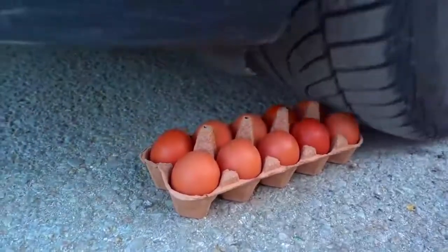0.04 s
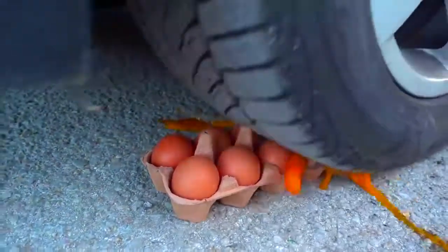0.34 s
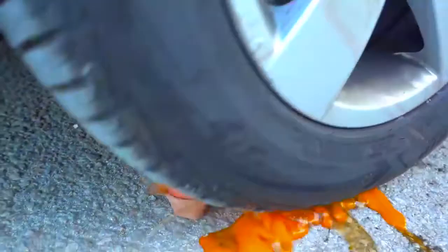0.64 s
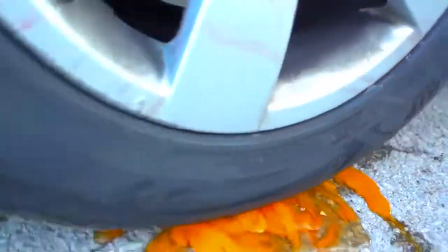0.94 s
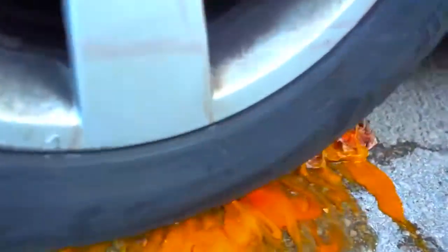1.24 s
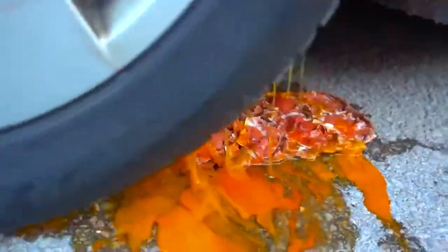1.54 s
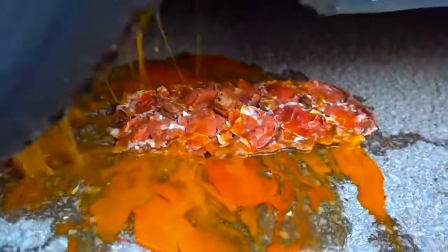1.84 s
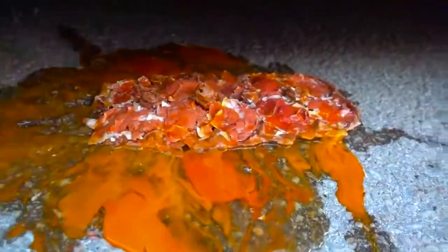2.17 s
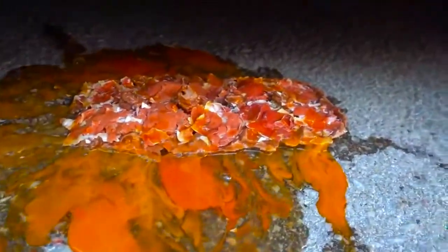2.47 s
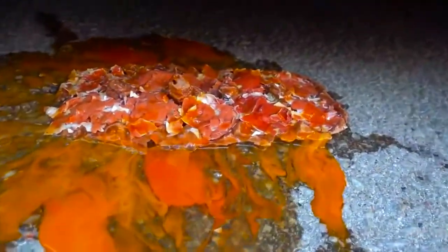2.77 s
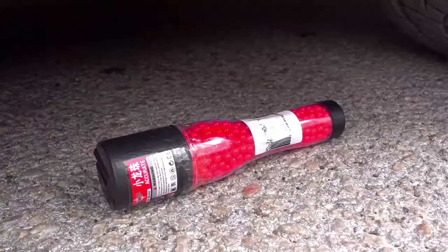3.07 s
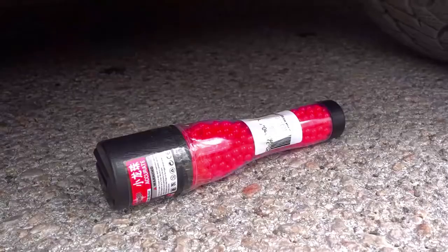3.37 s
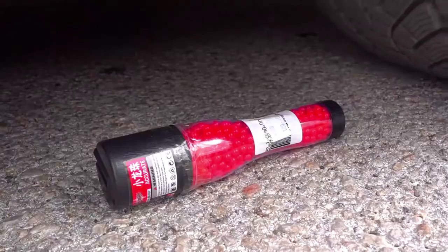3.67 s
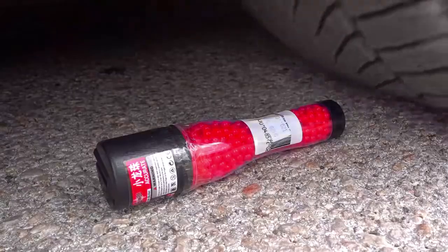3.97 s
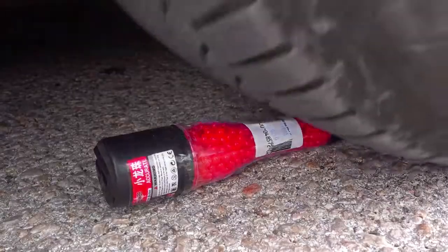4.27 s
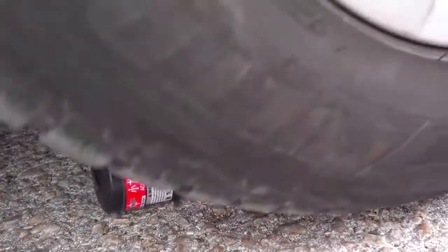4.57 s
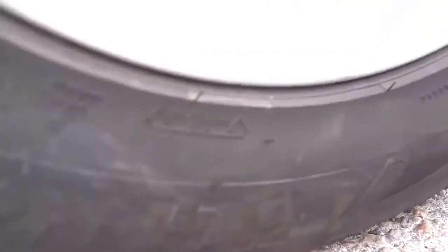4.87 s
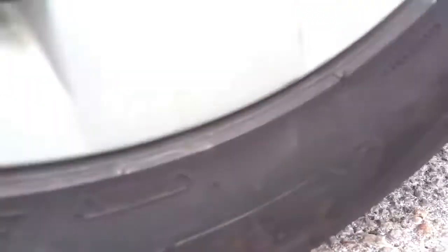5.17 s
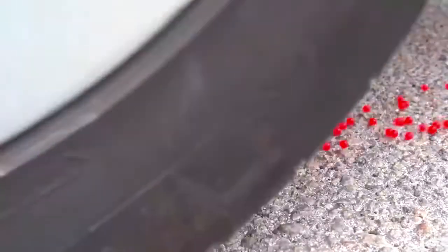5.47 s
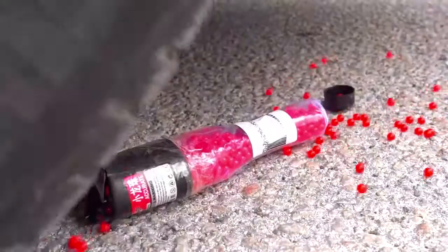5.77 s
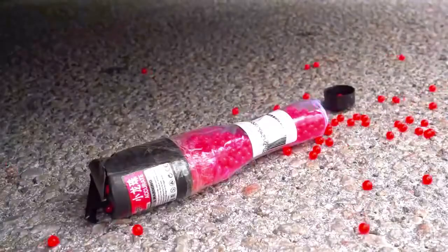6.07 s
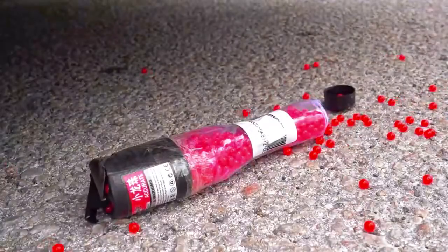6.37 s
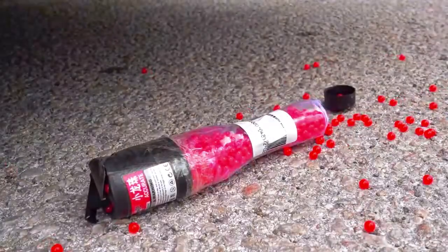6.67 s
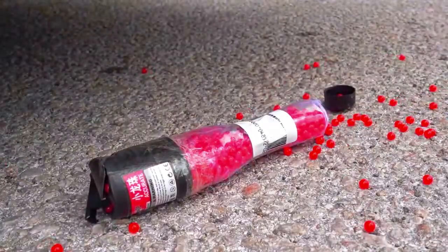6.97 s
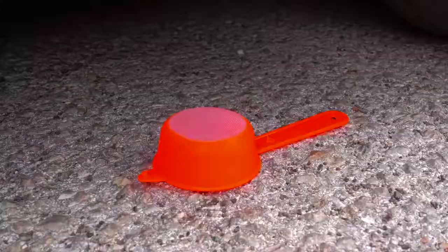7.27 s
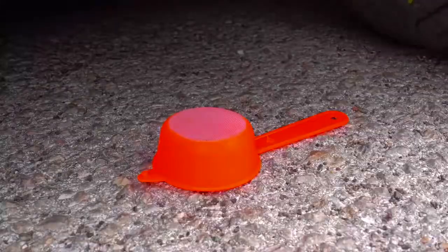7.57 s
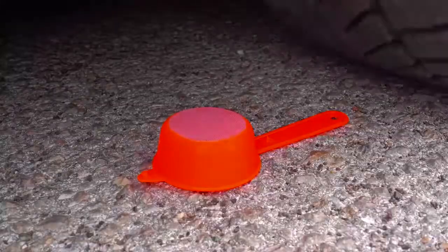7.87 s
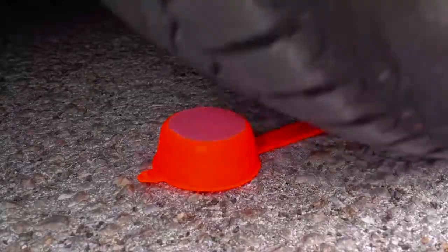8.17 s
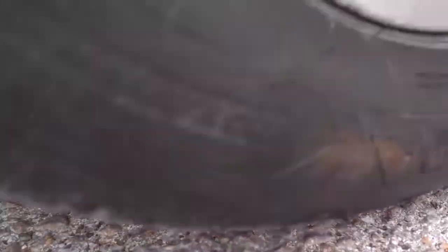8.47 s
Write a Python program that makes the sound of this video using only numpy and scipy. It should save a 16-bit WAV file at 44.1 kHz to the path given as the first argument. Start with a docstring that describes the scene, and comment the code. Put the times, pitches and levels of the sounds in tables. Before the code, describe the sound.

Close to a car wheel on asphalt, eggshells crackle and burst as the tyre thumps over their carton. After a lull of low rumble, faint engine and ticking grit, a plastic bottle full of beads buckles in a loud run of cracks and thuds. The beads settle, small stones pop under the rubber, and a plastic scoop snaps briefly at the end. A short echo comes from beneath the car.

```python
"""On asphalt, close to one wheel, a car tyre rolls slowly over a carton of eggs, a plastic bottle of
beads and a plastic scoop. Shells crackle and burst, plastic buckles in single snaps, and grit pops
under the tread. Each jolt thumps the tyre, and the air inside it hums on. The engine drones faintly
early on, and sound bouncing between the road and the underside of the car adds a short echo."""
import sys
import numpy as np
from scipy import signal
from scipy.fft import rfft, irfft
from scipy.io import wavfile
from scipy.ndimage import uniform_filter1d

SR = 44100
rng = np.random.default_rng(int(sys.argv[2]) if len(sys.argv) > 2 else 0)


def log_audio(samples):
    """Write samples as a 16-bit WAV file to the path given in sys.argv[1]."""
    # one column per channel
    frames = np.atleast_2d(samples).T
    # limit to full scale, then quantise
    limited = np.clip(frames, -1, 1)
    pcm = np.round(limited * 32767).astype(np.int16)
    wavfile.write(sys.argv[1], SR, pcm)


N = 375732
T = np.arange(N) / SR  # clock for the whole scene [s]
HIT_T = np.arange(8192) / SR  # clock for one short hit [s]

# Levels in the tables are relative: the functions turn whole layers up or down.
# the low drone of the engine: (time [s], pitch [Hz], level [dB])
ENGINE_DRONE = [(0.998, 39.7, -70), (1.11, 37.4, -71), (1.586, 38.4, -63), (1.91, 51.3, -51),
                (2.19, 49.8, -62), (2.746, 39.9, -73), (2.9, 40, -67.5)]
# two faint whines as the car rolls off: (start [s], end [s], first pitch [Hz], last pitch [Hz], level [dB])
FAINT_WHINES = [(1.48, 1.727, 3380, 3370, -63), (1.9, 2.196, 2270, 2160, -57.5)]
# the wheel rolls past each object:
# (start [s], end [s], time when nearest [s], speed [m/s], rumble [dB], tread [dB], fine grit [dB])
WHEEL_PASSES = [(0.0, 2.993, 1.02, 0.61, -53.5, -43.5, -66), (3.02, 7.22, 5.22, 0.96, -58.5, -41.5, -61),
                (7.221, 8.52, 8.04, 0.81, -51.5, -41.5, -54.5)]
# the rubber drops and jolts the tyre:
# (time [s], pitch [Hz], thump [dB], rumble [dB], low air note [dB], high air note [dB])
TYRE_JOLTS = [(0.115, 220, -16, -49, -26, -43), (0.192, 214, -12, -32, -16.5, -39.5),
              (0.317, 213, -9.5, -32.5, -23, -40), (0.449, 200, -15, -34, -18, -19.5),
              (0.57, 225, -20, -31, -20, -26.5), (0.701, 230, -11, -25.5, -21, -25),
              (2.385, 170, -29, -41, -54, -70), (3.416, 137, -34.5, -50.5, -70, -80),
              (4.388, 203, -6.5, -19, -15.5, -26), (4.438, 204, -10, -19, -32, -42),
              (4.473, 163, -15.5, -29, -42, -45), (4.68, 230, -19, -39, -35, -32.5),
              (4.869, 252, -9, -18.5, -19, -25), (4.977, 138, -9.5, -23, -24.5, -24),
              (5.226, 232, -7.5, -24.5, -19.5, -24), (5.374, 230, -24, -48, -25, -22),
              (7.209, 330, -28, -52, -64, -65), (7.808, 94.76, -28, -47.5, -66, -75),
              (7.974, 163, -23.5, -54, -55, -70), (8.36, 218, -29, -38.5, -43.5, -58)]
# the notes at which the body of the tyre rings: (pitch [Hz], level [dB], time to fade by 60 dB [s])
TYRE_BODY_NOTES = [(128, -11, 0.6), (338, -11, 0.5), (446, -12, 0.68), (542, -6.5, 0.41), (744, -26, 0.22),
                   (978, -4, 0.48)]
# a stone or brittle piece pops under the tread: (time [s], pitch [Hz], level [dB], left minus right [dB])
GRIT_POPS = [(1.0047, 760, -28, -0.5), (1.2586, 3400, -49.5, -13), (1.3038, 1100, -40.5, -2),
             (1.381, 1330, -38.5, -2.5), (1.416, 1110, -40.5, -2), (1.9426, 3900, -35.5, -8),
             (2.175, 2430, -53, 0), (2.5535, 1720, -47, 9), (2.7601, 2260, -51, -9),
             (3.5156, 1265, -44.5, 11), (3.7091, 1680, -50, -8), (3.8092, 4530, -55.5, 2),
             (3.891, 1670, -46, 10), (4.0048, 1690, -32, 5), (4.0932, 1730, -32, 6),
             (4.255, 7300, -31, -3.5), (6.534, 1060, -47, 14), (6.6886, 2350, -51.5, 17),
             (7.4165, 2050, -41.5, 14), (7.473, 1820, -46, 15), (7.5364, 1520, -44.5, 17),
             (7.699, 1780, -39, 8.5), (7.748, 2050, -44.5, 15), (7.822, 1672, -40, 9),
             (7.883, 2190, -32.5, 9), (7.9443, 2520, -34.5, 4), (8.0268, 1820, -27.5, 5),
             (8.048, 1840, -31, 4), (8.101, 2400, -32.5, 10), (8.155, 2150, -35.5, 11),
             (8.2036, 1570, -41.5, 8), (8.2725, 1040, -38.5, 7), (8.484, 1770, -45, -1)]
# a pocket of carton or the dented bottle springs free:
# (time [s], pitch [Hz], level [dB], time to fade by 60 dB [s])
HOLLOW_KNOCKS = [(1.304, 1026, -39.5, 0.038), (1.5456, 865, -33, 0.025), (5.7063, 816, -16, 0.02),
                 (5.7195, 840, -24.5, 0.062)]
# a shell or wall gives way, or the tyre slaps wet pulp as it peels off, in a shower of cracks: # (time [s],
# thud [dB], crack [dB], time to fade by 60 dB [s])
COLLAPSES = [(0.114, -28.5, -29, 0.15), (0.1603, -18.5, -36, 0.056), (0.177, -17, -33, 0.086),
             (0.283, -19.5, -40, 0.065), (0.4138, -19, -33, 0.1), (0.435, -13.5, -27.5, 0.098),
             (0.447, -20.5, -23, 0.065), (0.521, -19.5, -36.5, 0.099), (0.556, -19, -35, 0.17),
             (0.59, -20.5, -15, 0.26), (0.665, -15.5, -23, 0.23), (0.812, -26.5, -27, 0.1),
             (1.378, -43.5, -61, 0.3), (1.851, -36, -41.5, 0.047), (1.879, -37, -38, 0.14),
             (2.372, -35.5, -46, 0.097), (3.31, -46.5, -63.5, 0.21), (4.036, -37.5, -22, 0.094),
             (4.213, -42.5, -41.5, 0.16), (4.31, -40, -29.5, 0.23), (4.346, -33, -25, 0.17),
             (4.361, -13.5, -20.5, 0.26), (4.403, -21, -18.5, 0.13), (4.503, -37, -26, 0.16),
             (4.865, -20.5, -18.5, 0.12), (4.946, -15.5, -20.5, 0.2), (4.878, -23, -26, 0.1),
             (5.117, -22, -28.5, 0.11), (5.173, -14.5, -23.5, 0.24), (5.216, -13.5, -22.5, 0.24),
             (5.274, -22, -24.5, 0.13), (5.238, -21.5, -32, 0.13), (5.366, -19, -36, 0.12),
             (5.421, -26.5, -25, 0.11), (5.538, -35.5, -24, 0.1), (5.59, -23, -20, 0.13),
             (5.633, -29.5, -26.5, 0.2), (5.711, -35, -20.5, 0.11), (7.293, -41.5, -37, 0.19),
             (7.306, -39, -29, 0.092), (8.329, -29.5, -38, 0.049)]
# a wall buckles or a shell splits with one snap: (time [s], wall pitch [Hz], wall [dB], crack [dB])
SINGLE_SNAPS = [(0.3562, 867, -22, -14.5), (0.4354, 825, -24, -18), (0.4865, 900, -27, -17.5),
                (0.6246, 1000, -42, -18.5), (0.6668, 780, -23.5, -22), (4.442, 644, -45, -30),
                (4.572, 782, -26.5, -28), (4.6047, 856, -32, -25.5), (4.6241, 980, -20, -26),
                (4.64, 904, -24, -29.5), (4.651, 746, -22, -31.5), (4.67, 834, -27, -27.5),
                (4.6869, 860, -18, -28), (4.7065, 897, -49, -27), (4.77, 920, -24.5, -26.5),
                (4.8003, 980, -17.5, -27), (4.8241, 853, -35, -29.5), (4.8403, 960, -15, -26),
                (4.9195, 845, -17.5, -44), (5.001, 840, -27, -29), (5.0682, 920, -25.5, -27.5),
                (5.0856, 847, -25, -28), (5.1248, 800, -16.5, -33), (5.1611, 780, -18.5, -29.5),
                (5.216, 900, -23, -31), (5.2605, 830, -20, -30.5), (5.271, 950, -23, -27),
                (5.2866, 621, -29, -26.5), (5.344, 890, -22, -28), (5.3601, 925, -20, -27.5),
                (5.4384, 3150, -20.5, -29.5), (5.4544, 990, -16, -50), (5.5376, 1005, -28, -36.5),
                (5.5526, 1200, -21, -47), (5.9108, 4220, -42.5, -37), (5.9566, 4160, -43, -39.5),
                (6.0996, 4480, -41, -38.5), (8.306, 695, -31, -27), (8.318, 2122, -20, -19.5),
                (8.327, 1020, -26, -27.5), (8.3512, 2130, -20, -25)]
# the tyre pushes into the bottle: (start [s], end [s], wall crumple at the end [dB], bead crackle [dB])
BOTTLE_PUSHES = [(4.261, 4.339, -48.5, -37.5), (4.348, 4.706, -30.5, -30), (4.765, 4.849, -41.5, -33.5),
                 (4.856, 5.269, -22.5, -32), (5.35, 5.458, -31, -33.5), (5.542, 5.77, -50, -31.5)]
# the tyre bears down on the eggs, row after row: (start [s], end [s])
EGG_ROW_TIMES = [(0.143, 0.385), (0.38, 0.625), (0.656, 0.707)]

# Each tone says how strong a sound is from bass to treble: (frequency [Hz], level [dB])
ROAD_TONE = [(20, -1.5), (45, 0.5), (100, 0), (170, 1.5), (280, -1), (400, -4.5), (700, -37.5)]  # deep rumble of rolling
TREAD_TONE = [(200, -13.5), (400, 1), (700, 4), (1200, -2.5), (2100, -3), (3400, -11.5), (4700, -21),
              (9000, -44.5)]  # rubber blocks scuffing the road
GRIT_TONE = [(2000, -14.5), (4000, 0), (6000, -0.5), (11000, -5)]  # fine loose grit
STONE_TONE = [(500, -25.5), (1100, -1.5), (1900, -4), (3000, -6), (4500, -13.5), (9000, -39)]  # small stones shifting
RUBBER_TONE = [(25, -17), (55, -12.5), (85, 0), (140, 0.5), (200, 0), (290, -9), (500, -41)]  # the shaken tyre
THUD_TONE = [(60, -39.5), (200, 0.5), (500, 4.5), (1000, 5.5), (1500, -4.5), (3000, -32.5)]  # low part of a crack
CRACK_TONE = [(700, -21.5), (1500, 0), (2700, 4), (4000, 2), (5500, -11), (9000, -28)]  # middle part of a crack
TICK_TONE = [(2000, -36.5), (4600, 1), (7000, 1.5), (11000, -4.5), (15000, -9.5)]  # high part of a crack
WALL_TONE = [(150, -13.5), (260, -3.5), (399, -1.5), (457, -8.5), (495, -10), (536, 6.5), (689, -7.5),
             (941, 0), (1360, -9.5), (2200, -18.5), (2860, -45), (4840, -120)]  # crumpling bottle wall
BEAD_TONE = [(1180, -19), (2000, -9.5), (4260, 0), (4610, -3), (5030, -3.5), (9290, -5), (10600, -6),
             (11200, -21), (14600, -69), (22000, -120)]  # beads grinding together
CARTON_TONE = [(150, -14.5), (250, -8.5), (289, -4.5), (453, -3.5), (489, -1), (680, -5), (773, -4),
               (1220, -3), (1900, -7.5), (2470, -47), (4180, -120)]  # squashed paper pulp
SHELL_TONE = [(940, -22.5), (1600, -7.5), (2110, -3), (2610, 1), (3040, 1), (3970, -2), (4730, -6.5),
              (5500, -12), (7150, -47), (12100, -120)]  # breaking eggshell
SPLINTER_TONE = [(2940, -35), (5000, 0), (8870, -0.5), (10600, -4.5), (11200, -12), (14600, -43.5),
                 (22000, -120)]  # the finest bits of shell
ECHO_TONE = [(80, -11.5), (250, -3.5), (600, -0.5), (2000, 7), (5000, 2.0), (11000, -1.0)]  # road and car


def amp(db):
    """Turn decibels into a number to multiply by."""
    return 10 ** (np.asarray(db) / 20)


def unit(x):
    """Scale a sound so that its average strength (rms) is 1."""
    return x / np.sqrt(np.mean(x ** 2) + 1e-18)


def at_level(x, db):
    """Scale a hit so that its energy, spread over 10 ms, has this level."""
    return unit(x) * np.sqrt(.01 * SR / x.shape[-1]) * amp(db)


def add(out, time, x):
    """Mix a sound in at this time, in seconds."""
    i = int(time * SR)
    out[:, i:i + x.shape[-1]] += x[..., :N - i]


def convolve(x, response):
    """Let every sample of x set off a copy of the response; the length stays the same."""
    return signal.fftconvolve(x, np.atleast_2d(response), axes=1)[:, :x.shape[1]]


def colour(x, tone, size=4096):
    """Filter a sound to give it the bass and treble of a tone table."""
    hz, db = np.transpose(tone)
    grid_hz = np.arange(size // 2 + 1) * SR / size + 1
    shape_db = np.interp(np.log(grid_hz), np.log(hz), np.maximum(db, db.max() - 61.5))
    # these steps make the filter ring only after a click, never before it
    cepstrum = irfft(np.log(amp(shape_db)))[:size // 2]
    cepstrum[1:] *= 2
    return convolve(x, irfft(np.exp(rfft(cepstrum, size))))


def decay(t60):
    """The fade of a hit: down by 60 dB after t60 seconds."""
    return amp(-60 * HIT_T / t60)


def swell(start, end, attack_s, fade_db_per_s):
    """A level that rises, holds until the end time, then fades steadily."""
    rise = np.clip((T - start) / attack_s, 0, 1)
    return rise * amp(-fade_db_per_s * np.maximum(T - end, 0))


def ring(hz, t60, sag=0.):
    """One dying note; with sag it slides from above hz to below it as the load leaves."""
    pitch = hz * (1 + sag * (decay(t60) - .5))
    return np.sin(2 * np.pi * np.cumsum(pitch) / SR) * decay(t60)


def wobble(rate):
    """A random wander of about size 1 that turns rate times a second."""
    step = int(SR / rate)
    stairs = np.repeat(rng.standard_normal(N // step + 1), step)[:N]
    return unit(uniform_filter1d(stairs, step))


def crackle(n, rate, spread_db, pan_db=3, lag_s=.000035):
    """Tiny random breaks, rate a second; each reaches left and right a little apart."""
    timing, traits = (np.random.default_rng(seed) for seed in rng.integers(2 ** 31, size=2))
    at = timing.integers(0, n, int(rate * n / SR) + 1)
    sign, strength, lag, pan = traits.standard_normal((len(at), 4)).T
    size = np.sign(sign) * amp(spread_db * np.minimum(strength, 2.6))
    ears = []
    for side in (-.5, .5):
        arrival = np.rint(at + .5 + side * lag_s * SR * lag).astype(int)
        ears.append(np.bincount(np.clip(arrival, 0, n - 1), size * amp(side * pan_db * pan), n))
    return np.array(ears)


def grinding(tone, rate, spread_db):
    """Crackle with this tone that lasts the whole scene, at strength 1."""
    return unit(colour(crackle(N, rate, spread_db), tone))


def road_echo(x, near_db=-12, far_db=-23, near_t60=0.11, far_t60=0.93):
    """Add quick bounces between road and car, and a faint tail from the surroundings."""
    t = T[:SR]
    echo = 0
    for db, t60 in ((near_db, near_t60), (far_db, far_t60)):
        tail = rng.standard_normal((2, SR)) * amp(-60 * t / t60) * (t > .002)
        echo = echo + amp(db) * tail / np.sqrt(np.sum(tail[0] ** 2))
    return x + convolve(x, colour(echo, ECHO_TONE))


def engine():
    """The engine drones on one low note that rises and falls back."""
    times, hz, db = np.transpose(ENGINE_DRONE)
    fade = np.interp(T, [times[0] - .1, times[0], times[-1], times[-1] + .4], [0, 1, 1, 0])
    level = fade * amp(np.interp(T, times, db) + 2.5)
    pitch = np.interp(T, times, hz)
    return level * np.sin(2 * np.pi * np.cumsum(pitch) / SR)


def whines():
    """Two faint, high, wavering notes as the car rolls off."""
    out = 0
    for start, end, first_hz, last_hz, db in FAINT_WHINES:
        pitch = np.interp(T, [start, end], [first_hz, last_hz]) * (1 + 0.0205 * wobble(260))
        level = amp(db) * swell(start, end, attack_s=0.08, fade_db_per_s=55)
        out += level * np.sin(2 * np.pi * np.cumsum(pitch) / SR)
    return out


def rolling(distance_m=0.29):
    """The wheel rolls by: the tread grows louder as it nears, the grit less so, the rumble stays."""
    rumble = tread = grit = 0
    for start, end, nearest, speed, rumble_db, tread_db, grit_db in WHEEL_PASSES:
        present = swell(start, end, attack_s=0.0087, fade_db_per_s=402)
        closeness = distance_m / np.hypot(distance_m, speed * (T - nearest))
        rumble += present * amp(rumble_db)
        tread += present * amp(tread_db) * closeness
        grit += present * amp(grit_db) * closeness ** 0.63
    out = rumble * grinding(ROAD_TONE, rate=1900, spread_db=1)
    # the tread scuffs unevenly as block after block meets the road
    out += tread * amp(2.7 * wobble(20) - 1.74) * grinding(TREAD_TONE, rate=3500, spread_db=2.5)
    out += amp(4) * grit * grinding(GRIT_TONE, rate=9000, spread_db=4.5)
    # now and then a small stone shifts under the rubber
    stones = road_echo(grinding(STONE_TONE, rate=22, spread_db=1), near_db=5.5)
    return out + amp(-16) * tread * stones


def egg_load(linger_s, fade_db_per_s, build_db_per_s=0, attack_s=0.036):
    """The weight on the carton rises and eases row by row; linger_s shifts when the last row fades."""
    rows = []
    for start, end in EGG_ROW_TIMES[:-1]:
        build = amp(-build_db_per_s * np.maximum(end - T, 0))
        rows.append(build * swell(start, end, attack_s, fade_db_per_s=262.5))
    start, end = EGG_ROW_TIMES[-1]
    rows.append(swell(start, end + linger_s, attack_s, fade_db_per_s))
    return np.max(rows, axis=0)


def jolted(levels_db, loss_db_per_s, attack_s=0.0056):
    """The strength of a shaking that every jolt feeds and that dies away at this rate."""
    lost_db = np.cumsum(loss_db_per_s * np.ones(N)) / SR
    energy = np.zeros((1, N))
    for (time, *_), db in zip(TYRE_JOLTS, levels_db):
        lost_after = lost_db[int(time * SR):][:2 * SR]
        rise = np.minimum(T[:len(lost_after)] / attack_s, 1)
        add(energy, time, (rise * amp(db - lost_after + lost_after[0])) ** 2)
    return np.sqrt(energy[0])


def tyre(air_hz=233.4, belt_hz=84.2, pitch_shake=0.0408):
    """The jolted rubber thumps and rumbles, the air inside hums, and the belt under the tread sways."""
    out = np.zeros((2, N))
    for time, hz, db, *_ in TYRE_JOLTS:
        add(out, time, amp(db) * ring(hz, t60=0.045, sag=0.75))
    rumble_db, low_note_db, high_note_db = np.transpose(TYRE_JOLTS)[3:]
    rumble = jolted(rumble_db, loss_db_per_s=150)
    out += amp(2.6) * rumble * grinding(RUBBER_TONE, rate=700, spread_db=4.5)
    # while the tyre is dented, its pitch shakes and the low air note dies faster
    dent = np.maximum(np.sqrt(rumble / rumble.max()), egg_load(linger_s=0.075, fade_db_per_s=65))
    phase_per_hz = 2 * np.pi * np.cumsum(1 + pitch_shake * dent * wobble(45)) / SR
    out += jolted(low_note_db, loss_db_per_s=27 + 104.5 * dent) * np.sin(air_hz * phase_per_hz)
    out += jolted(high_note_db, loss_db_per_s=123) * np.sin(1.987 * air_hz * phase_per_hz)
    # the eggs set the belt swaying, and a little of that rings on
    sway = amp(-35) * egg_load(linger_s=0.021, fade_db_per_s=160)
    sway += amp(-45) * egg_load(linger_s=0.03, fade_db_per_s=11.5)
    return out + sway * np.sin(belt_hz * phase_per_hz)


def tyre_body(x):
    """The tyre presses on the breaking things and rings along with them."""
    body = sum(amp(db) * 2 * ring(hz, t60) / decay(t60).sum() for hz, db, t60 in TYRE_BODY_NOTES)
    return x + convolve(x, body)


def pops(ring_cycles=13, scatter_db=-6):
    """A hard piece slips from the tread: a tick and a brief ring, scattered in the wheel arch."""
    out = np.zeros((2, N))
    for time, hz, db, pan_db in GRIT_POPS:
        chip = crackle(len(HIT_T), rate=9000, spread_db=5) * decay(t60=.008)
        direct = at_level(colour(chip, TICK_TONE), db - 20) + at_level(colour(chip, STONE_TONE), db - 8)
        direct += at_level(ring(hz, ring_cycles / hz, sag=0.34), db + 0.3)
        arch = crackle(len(HIT_T), rate=5600, spread_db=7.5, pan_db=-1) * decay(t60=0.068)
        arch *= amp(scatter_db) / np.sqrt(np.sum(arch[0] ** 2))
        left_right = amp([[pan_db / 2], [-pan_db / 2]])
        add(out, time, direct * left_right + convolve(direct, arch))
    return out


def knocks(rise_t60=0.0035, crunch_db=-9):
    """A hollow springs back with a crunch and one quickly dying note."""
    out = np.zeros((2, N))
    for time, hz, db, t60 in HOLLOW_KNOCKS:
        crunch = colour(crackle(len(HIT_T), rate=6000, spread_db=4) * decay(t60), STONE_TONE)
        note = ring(hz, t60, sag=0.27) * (1 - decay(rise_t60))
        add(out, time, at_level(note, db) + at_level(crunch, db + crunch_db))
    return out


def treble_db(time, crack_db, bottle_from_s=4.2, bottle_to_s=6.3, soft_db=-23.5):
    """Level of a crack's treble: the bottle is brighter than shell, stone or scoop; soft is duller."""
    material_db = 1 if bottle_from_s < time < bottle_to_s else -7.5
    return crack_db + material_db - 0.84 * max(soft_db - crack_db, 0)


def small_snaps(count=20, wall_hz=830, pitch_spread=0.23, spread_db=3):
    """Extra snap rows: the bottle wall makes small flips at random, stronger in the harder pushes."""
    start, end, wall_db, bead_db = np.transpose(BOTTLE_PUSHES)
    edges = np.r_[0, np.cumsum(end - start)]  # the pushes laid end to end
    rows = []
    for k, (place, pitch, size) in enumerate(rng.uniform(-1, 1, (count, 3))):
        pushed_s = edges[-1] * (k + .5 + place / 2) / count
        push = np.searchsorted(edges, pushed_s) - 1
        time = start[push] + pushed_s - edges[push]
        hz = wall_hz * (1 + pitch_spread * pitch)
        size_db = spread_db * size
        rows.append((time, hz, wall_db[push] - 6 + size_db, bead_db[push] - 4 + size_db))
    return rows


def snaps():
    """A wall flips over: a sharp crack, and the wall swings briefly before it stops."""
    out = np.zeros((2, N))
    fade = decay(t60=0.0061) + 0.11 * decay(t60=0.06)
    for time, hz, wall_db, crack_db in SINGLE_SNAPS + small_snaps():
        split = crackle(len(HIT_T), rate=14000, spread_db=5.5) * fade
        add(out, time, at_level(colour(split, CRACK_TONE), crack_db - 3))
        add(out, time, at_level(colour(split, TICK_TONE), treble_db(time, crack_db) + 6.5))
        add(out, time, at_level(ring(hz, t60=0.0091, sag=0.055), wall_db - 1.6))
    return out


def bursts():
    """Each collapse sets off a dying shower of small cracks: low, middle and high."""
    out = np.zeros((2, N))
    for time, thud_db, crack_db, t60 in COLLAPSES:
        tick_db = treble_db(time, crack_db) + 2
        for tone, db in ((THUD_TONE, thud_db + 1.1), (CRACK_TONE, crack_db - 0.75), (TICK_TONE, tick_db)):
            shower = crackle(len(HIT_T), rate=4000, spread_db=4.5) * decay(t60)
            add(out, time, at_level(colour(shower, tone), db))
    return out


def bottle(attack_s=0.016, build_db_per_s=25):
    """In each push the wall crumples ever harder and the beads grind; after the last they settle."""
    wall = 0
    beads = amp(-44) * swell(*BOTTLE_PUSHES[-1][:2], attack_s, fade_db_per_s=36)  # the slow settling
    for start, end, wall_db, bead_db in BOTTLE_PUSHES:
        push = swell(start, end, attack_s, fade_db_per_s=190)
        wall += push * amp(wall_db - build_db_per_s * np.maximum(end - T, 0))
        beads = np.maximum(beads, push * amp(bead_db))
    out = amp(-0.5) * wall * grinding(WALL_TONE, rate=350, spread_db=6.5)
    return out + amp(-1) * beads * grinding(BEAD_TONE, rate=1200, spread_db=7)


def eggs(clump_db=1.5):
    """The carton squashes while the shells break, clump by clump, into pieces and fine splinters."""
    clumps = unit(amp(clump_db * wobble(110.5)))
    rubber = amp(-29) * egg_load(linger_s=0.011, fade_db_per_s=168)
    carton = amp(-28) * egg_load(linger_s=0.053, fade_db_per_s=50)
    shells = amp(-19.5) * egg_load(linger_s=-0.14, fade_db_per_s=56.5, build_db_per_s=31)
    splinters = amp(-25.5) * egg_load(linger_s=0.021, fade_db_per_s=93)
    out = rubber * grinding(RUBBER_TONE, rate=900, spread_db=1.5)
    out += carton * grinding(CARTON_TONE, rate=1500, spread_db=4)
    out += shells * clumps * grinding(SHELL_TONE, rate=3300, spread_db=8)
    return out + splinters * clumps * grinding(SPLINTER_TONE, rate=4300, spread_db=5.5)


def scene():
    """The crushing rings through the tyre and echoes under the car, over the quiet sounds of rolling."""
    crush = tyre_body(eggs() + bottle() + bursts() + snaps())
    under_car = road_echo(crush + knocks() + pops() + tyre())
    return under_car + rolling() + whines() + engine()


def record(dry, ceiling=0.52, top_hz=11100):
    """Round off the tallest peaks and cut the highest treble."""
    rounded = ceiling * np.tanh(dry / ceiling)
    return signal.sosfilt(signal.ellip(10, .2, 70, top_hz, fs=SR, output="sos"), rounded)


dry = scene()
out = record(dry)
log_audio(out)
```